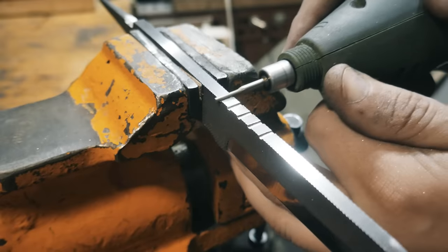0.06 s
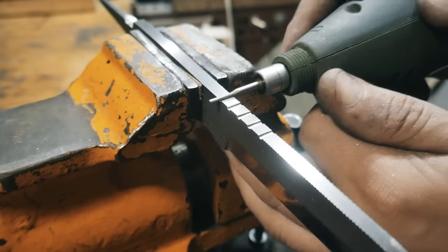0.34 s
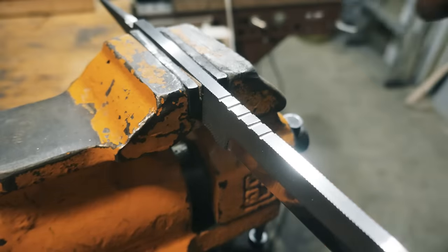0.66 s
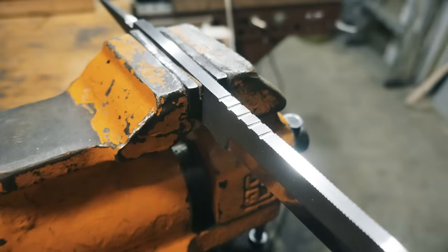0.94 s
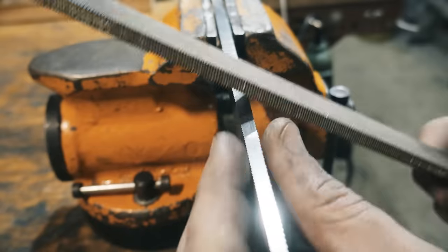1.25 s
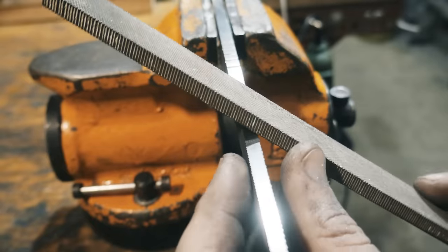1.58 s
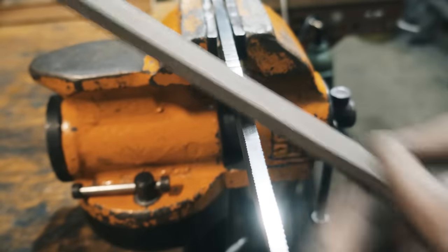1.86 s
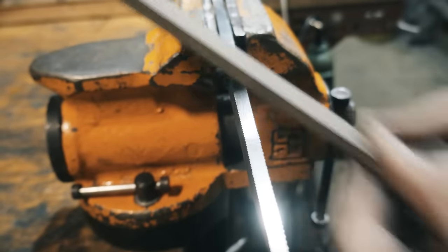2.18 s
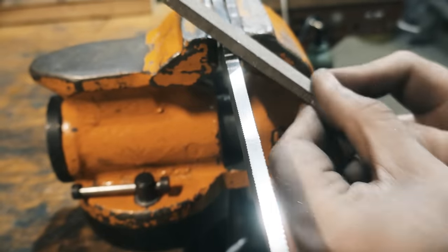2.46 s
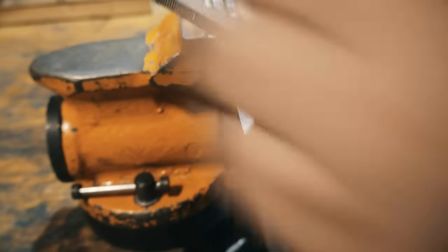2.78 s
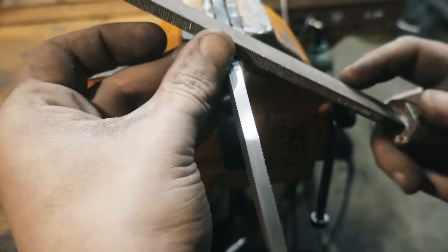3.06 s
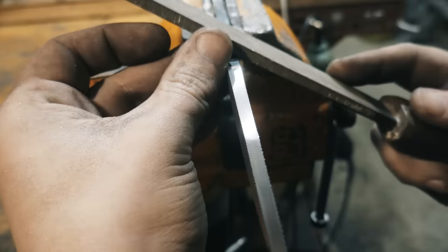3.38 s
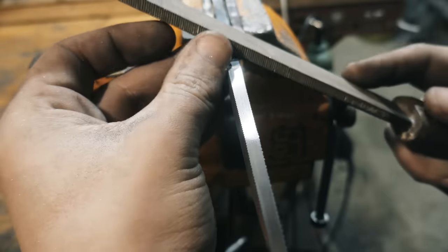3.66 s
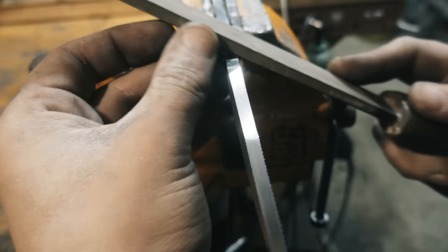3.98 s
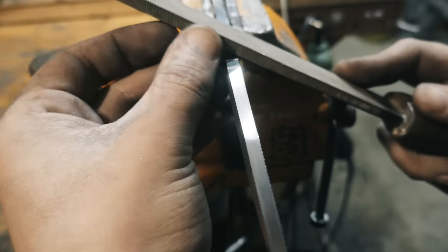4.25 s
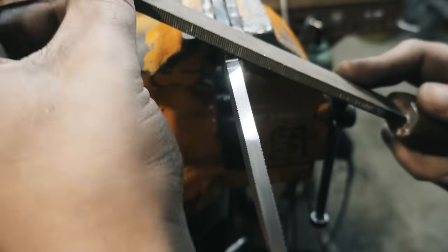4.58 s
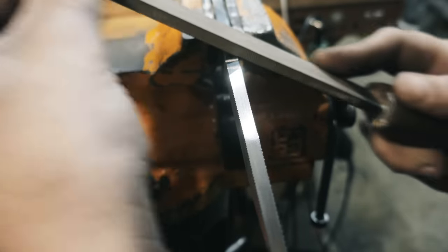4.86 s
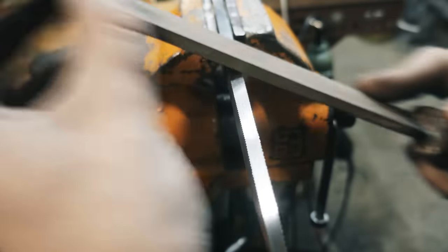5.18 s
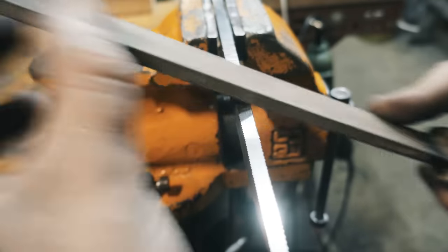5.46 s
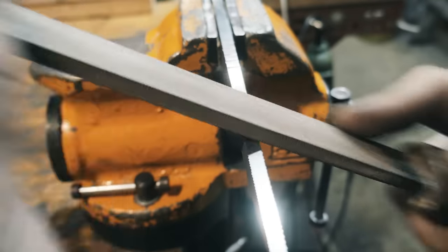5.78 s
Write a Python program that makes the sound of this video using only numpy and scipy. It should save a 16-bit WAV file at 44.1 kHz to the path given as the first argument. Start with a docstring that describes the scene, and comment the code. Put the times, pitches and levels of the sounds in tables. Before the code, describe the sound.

After a brief rotary tool whine, a hand file scrapes rapidly back and forth on a steel blade, knocking and shaking the vice.

```python
"""A rotary tool whines as its disc nicks a steel blade in a vice, grazes, runs free and is cut short at 1.2 s.
Fingers slide on the metal; a hand file is lined up with knocks, single passes and faint squeaks.
From 1.9 s to 6 s it rasps in runs of very quick strokes, with a firm, a light, then a flat grip:
its teeth set the steel ringing while vice and bench rumble and knock under the push.
The small, dry workshop hums quietly under the filing."""
import sys
import numpy as np
from scipy import signal
from scipy.fft import rfft, irfft, next_fast_len
from scipy.io import wavfile
from scipy.ndimage import uniform_filter1d

SR = 44100
rng = np.random.default_rng(int(sys.argv[2]) if len(sys.argv) > 2 else 0)


def int16_out(signal):
    """Quantize to a 16-bit WAV file."""
    q = np.round(np.clip(np.atleast_2d(signal).T, -1, 1) * 32767)
    wavfile.write(sys.argv[1], SR, q.astype(np.int16))


N = 265482
TIME = np.arange(N) / SR
PADDED = next_fast_len(N + SR // 2)
GRIP_CHANGES_S = (3.76, 4.94)   # firm to light, light to flat

# bench modes: f/Hz, width/Hz, relative level/dB
BENCH_MODES = [(67, 9, -8), (151, 44, 1.5), (206.7, 28.4, 5), (306, 31, -5), (371.4, 29, -6),
               (471, 32, -0.5)]
# stereo width at the bench: f/Hz, side minus mid/dB
BENCH_WIDTH = [(60, -19.5), (250, -24), (400, -14), (700, -6), (1300, -8), (2500, -12), (4400, -8),
               (8100, 2.5), (15000, -7)]
# balance at the bench: f/Hz, left minus right/dB
BENCH_PAN = [(200, .5), (700, 1.5), (1100, 1.5), (3300, 0.5), (4700, -4), (6200, -0.5), (8200, 2.5),
             (10000, 1.5), (15000, 0)]


def from_db(db):
    """Decibels to gain."""
    return 10 ** (np.asarray(db) / 20)


def rms_one(x):
    """Scale to rms 1."""
    return x / np.sqrt(np.mean(x ** 2) + 1e-20)


def in_time(rows):
    """Columns of a curve at every sample."""
    s, *columns = np.transpose(rows)
    return [np.interp(TIME, s, c) for c in columns]


def at_hz(points, hz):
    """Read a spectrum on a log-frequency axis."""
    f, value = np.transpose(points)
    return np.interp(np.log(hz), np.log(f), value)


def bins(size):
    """FFT frequencies in Hz, floored at 1."""
    return np.maximum(np.arange(size // 2 + 1) * SR / size, 1)


def drift(rate_hz):
    """Random curve through unit-variance knots."""
    knots = rng.standard_normal(2048)
    return np.interp(TIME * rate_hz, np.arange(len(knots)), knots)


def colour(spectrum, modes=(), size=PADDED):
    """Unit-power response: a broad spectrum with resonances on top."""
    f = bins(size)
    peaks = 1 + sum(from_db(db) / (1 + 2j * (f - hz) / width) for hz, width, db in modes)
    response = from_db(at_hz(spectrum, f)) * peaks
    return response / np.sqrt(np.mean(np.abs(response) ** 2))


def stereo(pair, response, width=BENCH_WIDTH, pan=BENCH_PAN, size=PADDED):
    """Two signals as mid and side, filtered and placed band by band."""
    mid, side = rfft(pair, size)
    f = bins(size)
    ears = np.array([[1], [-1]])
    spread = mid + ears * side * from_db(at_hz(width, f))
    placed = spread * from_db(ears * at_hz(pan, f) / 2)
    return irfft(placed * response, size)[:, :pair.shape[1]]


def stereo_noise(spectrum, modes=()):
    """Coloured noise placed at the bench."""
    return stereo(rng.standard_normal((2, N)), colour(spectrum, modes))


def swells(times_s, levels_db, width_s, tail_s, tail_db):
    """Envelope of Gaussian swells with exponential tails."""
    power = np.zeros(N)
    for s, db in zip(times_s, levels_db):
        near = slice(max(int(s * SR) - SR // 8, 0), int(s * SR) + SR // 8)
        power[near] += from_db(db) ** 2 * np.exp(-.5 * ((TIME[near] - s) / width_s) ** 2)
    pole = np.exp(-1 / (tail_s * SR))
    tail = signal.lfilter([1 - pole], [1, -pole], power + 1e-18)
    return np.sqrt(power + from_db(tail_db) ** 2 * tail)


def file_strokes(uneven_db=1.0, slip_s=0.0032, sing_spread=0.027, rasp_accent=0.31):
    """Single passes, then runs out and back at an even or quickening pace; columns as in touches."""
    # lining up: t/s, length/s, rasp level/dB, rumble level/dB, singing f/Hz
    touches = [(1.312, 0.041, -71, -83, 1380), (1.389, 0.048, -64.5, -52.5, 2170),
               (1.526, 0.11, -60.5, -40, 1450), (1.598, 0.036, -77, -53.5, 3860),
               (1.682, .03, -66, -58, 1190), (1.768, 0.043, -59, -38, 1180), (1.811, 0.058, -41, -35, 1030),
               (2.942, 0.018, -64, -61, 1130), (2.995, 0.034, -60.5, -54, 2420),
               (3.025, 0.035, -62.5, -57.5, 2240)]
    # runs: first t/s, last t/s, count, quickening/0-1, out minus back/dB, out f/Hz, back f/Hz
    runs = [(1.87, 2.233, 8, 0, 0.5, 3190, 2300), (2.292, 2.793, 12, 0.2, -2.5, 3380, 2180),
            (3.416, 3.665, 6, 0.36, -0.5, 1200, 2330), (3.847, 4.489, 18, 0.07, 6, 1330, 1630),
            (4.589, 5.088, 13, 0, -4, 1600, 2140), (5.137, 5.51, 9, 0, 3.5, 2090, 2740),
            (5.556, 6.02, 11, 0.02, 1, 2900, 1920)]
    # hand pressure: t/s, rasp level/dB, rumble level/dB
    pressure = [(1.87, -43.5, -31.5), (2.25, -41, -38), (2.731, -49, -40), (2.79, -66, -57.5),
                (3.42, -64.5, -44.5), (3.59, -55, -42.5), (3.67, -68.5, -55), (3.85, -54, -40),
                (4.02, -57.5, -44.5), (4.28, -47.5, -37.5), (4.4, -55.5, -42), (4.49, -47.5, -45),
                (4.59, -57, -40.5), (4.63, -47.5, -35), (4.9, -58, -45.5), (5.02, -42.5, -35),
                (5.25, -42.5, -41), (6, -45.5, -39)]
    pressure_s, rasp_db, rumble_db = np.transpose(pressure)
    rows = list(touches)
    for first_s, last_s, count, quickening, out_over_back_db, out_hz, back_hz in runs:
        along = np.linspace(0, 1, int(round(count)))
        s = first_s + (last_s - first_s) * along * (1 + quickening * (1 - along))
        going_out = np.arange(len(s)) % 2 == 0
        force, spot, slip = rng.standard_normal((len(s), 3)).T
        accent_db = out_over_back_db * (going_out - .5) + uneven_db * force
        rows += zip(s + slip_s * slip, np.gradient(s),
                    np.interp(s, pressure_s, rasp_db) + rasp_accent * accent_db,
                    np.interp(s, pressure_s, rumble_db) + accent_db,
                    np.where(going_out, out_hz, back_hz) * (1 + sing_spread * spot))
    return np.array(rows)


def rasp(strokes, gain_db=-2.5, bites_per_s=5000, duty=0.35, drag_db=-21, mode_spread_db=5.0, size=8192):
    """Teeth bite in dense, uneven clicks; each stroke meets a new spot and rings the steel differently."""
    # rasp spectrum per grip: f/Hz, relative level/dB
    firm = [(350, -40), (600, -8.5), (800, -9.5), (1100, -5.5), (1400, -4), (2200, -6), (2950, -5.5),
            (3300, -1.5), (4100, -13.5), (4700, -11), (5700, -24.5), (7500, -33), (12000, -28),
            (13700, -43), (15400, -31)]
    light = [(350, -20), (600, -30), (700, 3.5), (820, -10), (1100, -4.5), (2200, -6.5), (2700, -9),
             (3700, -11.5), (4600, -4), (5700, -21.5), (8200, -29), (12000, -29), (15400, -45)]
    flat = [(350, -32), (600, -13), (700, -3), (830, -7), (1100, -1.5), (1800, -3), (2200, -3.5),
            (2750, -3.5), (3650, -7.5), (4500, -3.5), (6700, -23.5), (9500, -29), (12200, -22.5),
            (13700, -44), (15400, -33)]
    # blade and vice modes: f/Hz, width/Hz, level re broad rasp/dB
    steel_modes = [(696, 42, 6), (932, 16, 3.5), (1094, 21.4, 7.5), (1312, 68, -7), (1553, 22.5, 6),
                   (1960, 64, -0.5), (2205, 53, 10), (2475, 29, 6), (2720, 11, 6.5), (3190, 22, -5),
                   (3345, 19, -2.5), (4560, 114, -9), (6155, 58, 5), (8220, 450, 4), (12800, 240, -23)]
    sing_width_hz, sing_db = 130, 5.5
    bark_hz, bark_width_hz, settle_s = 900, 720, 1.77
    dulling, firm_stroke_db = 0.21, -42.5
    bites = from_db(2.5 * np.minimum(rng.exponential(1, N), 4)) * (rng.random(N) < bites_per_s / SR)
    grit = rng.standard_normal((2, N)) * (rms_one(bites) + 1)
    chatter = from_db(1.75 * drift(300))
    teeth = np.pad(rms_one(grit * chatter), ((0, 0), (0, size)))
    t = (np.arange(size) - size // 2) / SR
    octaves = np.log2(np.clip(bins(size), 600, 5000) / 600)
    out = np.zeros((2, N + size))
    for s, length_s, level_db, _, sing_hz in strokes:
        # the file speeds up, slows down, then drags lightly as it turns round
        push = np.exp(-np.abs(t / (duty * length_s)) ** 2.12)
        push += from_db(drag_db) * np.exp(-(2 * t / length_s - .5) ** 2)
        modes = [(hz, width, db + mode_spread_db * rng.standard_normal())
                 for hz, width, db in steel_modes]
        bark_db = 6 - 40 * abs(s - settle_s)   # the blade barks as the file settles on the fresh edge
        modes += [(sing_hz, sing_width_hz, sing_db), (bark_hz, bark_width_hz, bark_db)]
        spectrum = (firm, light, flat)[np.searchsorted(GRIP_CHANGES_S, s)]
        tilt = from_db(dulling * (level_db - firm_stroke_db) * octaves)   # gentler is duller
        span = slice(int(s * SR) - size // 2, int(s * SR) + size // 2)
        stroke = stereo(teeth[:, span] * push, tilt * colour(spectrum, modes, size), size=size)
        out[:, span] += from_db(level_db + gain_db) * rms_one(stroke) * np.sqrt(np.mean(push ** 2))
    return out[:, :N]


def bench_rumble(strokes, gain_db=-4.5, lag_s=0.0035):
    """The drag of each stroke shakes vice and bench, which answer a little late."""
    # rumble spectrum per grip: f/Hz, relative level/dB
    firm = [(30, -40), (90, -22), (135, 4), (210, 0), (330, 2.5), (600, -10.5), (800, -48)]
    light = [(30, -23), (60, -5.5), (105, -12), (180, 3.5), (330, -5.5), (600, -16.5), (800, -55.5)]
    flat = [(30, -36), (65, -12), (110, -15), (190, 2), (270, -3), (600, -15.5), (800, -48.5)]
    s, _, _, level_db, _ = strokes.T
    per_grip = [stereo_noise(spectrum, BENCH_MODES) for spectrum in (firm, light, flat)]
    shake = np.choose(np.searchsorted(GRIP_CHANGES_S, TIME), per_grip)
    local_rms = np.sqrt(uniform_filter1d(np.mean(shake ** 2, axis=0), size=1100) + 1e-9)
    envelope = swells(s + lag_s, level_db + gain_db, width_s=0.0098, tail_s=0.013, tail_db=-3)
    return shake / local_rms * envelope


def rotary_tool(stop_s=1.179, jitter=0.0034, chop=0.46, bounce_hz=17.66, bounce_db=2.5, grind_db=-70):
    """Shaft harmonics change as the disc leaves the steel; air and grinding are chopped once a turn."""
    # shaft speed: t/s, f/Hz
    speed = [(0.03, 540), (0.116, 550), (0.21, 545.0), (0.282, 533.3), (0.444, 526), (0.544, 537.0),
             (0.744, 549.2), (1.018, 552), (1.15, 550)]
    # tool levels: t/s, shaft tone/dB, third harmonic/dB, hiss/dB
    levels = [(0.0, -47.5, -71, -61.5), (0.066, -44.5, -61.5, -65.5), (0.268, -51.5, -66.5, -67.5),
              (0.436, -52, -69.5, -68.5), (0.468, -49, -74, -68.5), (0.6, -49, -63.5, -68),
              (0.732, -54, -55.5, -68), (0.856, -51, -54, -63), (1.16, -51, -51, -64.5)]
    # shaft harmonics, cutting and running free: multiple, level/dB
    cutting = [(2, -69), (4, -68), (5, -69), (6, -78), (7, -77), (8, -86), (9, -73.5), (10, -78.5),
               (11, -76.5), (12, -78), (13, -86), (14, -86), (15, -89), (16, -92), (17, -75), (18, -71.5),
               (19, -79), (20, -82), (21, -92), (22, -80), (23, -92), (24, -78), (25, -84), (26, -85)]
    free = [(2, -77), (4, -66), (5, -77), (6, -59), (7, -70), (8, -65.5), (9, -80), (10, -90), (11, -90),
            (12, -83), (13, -85), (14, -89), (15, -86), (16, -87), (17, -90), (18, -76), (19, -86),
            (20, -77), (21, -84), (22, -80), (23, -81), (24, -84), (27, -85)]
    # cooling air and disc hiss: f/Hz, relative level/dB
    air_spectrum = [(90, -31), (250, -6.5), (600, 1.5), (1000, -1), (1800, 8.5), (2500, 4), (3100, -1.5),
                    (4600, 0), (6500, -9.5), (9500, -5), (12500, -6), (15500, -12)]
    # disc grinding on steel: f/Hz, relative level/dB
    grind_spectrum = [(1500, -14), (3500, -2), (5300, 7), (7000, -1), (8800, 6), (9550, 6), (10500, 2),
                      (13000, -7), (15500, -7)]
    # stereo width: f/Hz, side minus mid/dB
    width = [(100, 2), (700, -15.5), (2400, -15), (4400, -10), (8100, 3), (15000, -7)]
    # balance: f/Hz, left minus right/dB
    pan = [(540, 0), (1600, -4.5), (3300, -0.5), (4500, -3.5), (5700, -4), (7000, -1), (10000, -1),
           (15000, -2)]
    shaft_hz, = in_time(speed)
    shaft_db, third_db, hiss_db = in_time(levels)
    contact = disc_contact()
    phase = 2 * np.pi * np.cumsum(shaft_hz * (1 + jitter * contact * drift(150.8))) / SR
    swing_db = bounce_db * np.cos(2 * np.pi * bounce_hz * (TIME - .26))
    judder = contact * from_db(swing_db + 3.5 * np.tanh(drift(72)))   # the disc bites unevenly
    whine = np.zeros((2, N))
    for k in range(1, 29):
        # unbalance tones 1 and 3 are firm; the rest flutter with the cut and the bearing play
        waver_db = 6 * np.tanh(drift(28.8))
        play_db = 3.5 * drift(11.86)
        loaded = judder * from_db(np.interp(k, *np.transpose(cutting)) - 1.5 + waver_db)
        idle = (1 - contact) * from_db(np.interp(k, *np.transpose(free)) + play_db)
        gain = from_db(shaft_db) if k == 1 else from_db(third_db) if k == 3 else np.hypot(loaded, idle)
        hz = k * shaft_hz[0]
        angle = k * phase + rng.uniform(0, 2 * np.pi)
        side = from_db(at_hz(width, hz)) * np.cos(angle)
        for ear, sign in enumerate((1, -1)):
            balance = from_db(sign * at_hz(pan, hz) / 2)
            whine[ear] += np.sqrt(2) * balance * gain * (np.sin(angle) + sign * side)
    air, grit = rng.standard_normal((2, 2, N)) * (1 + chop * np.sin(phase))
    hiss = stereo(air * from_db(hiss_db + 1), colour(air_spectrum), width, pan)
    grinding = stereo(grit * judder * from_db(grind_db), colour(grind_spectrum), width, pan)
    running = np.clip((stop_s - TIME) / .01, 0, 1)
    return running * (whine + hiss + grinding)


def disc_contact(bite_s=0.039, graze_s=0.49, lift_s=0.88, ramp_s=0.21, graze_share=0.41):
    """Contact of disc and steel, 0-1: it bites, eases to a graze and lifts off."""
    bitten, eased, lifted = (np.clip((TIME - s) / ramp_s + .5, 0, 1) for s in (bite_s, graze_s, lift_s))
    return bitten * (1 - (1 - graze_share) * eased) * (1 - lifted)


def knocks(gain_db=-10, spread_db=1.5, band_hz=(110, 380)):
    """The file lands or catches: soft blows on the bench modes."""
    # blows: t/s, level/dB
    landings = [(1.39, -39.5), (1.521, -31), (1.67, -42.5), (1.79, -30), (1.867, -26.5), (2.618, -29.5),
                (2.992, -39), (3.473, -36.5), (3.84, -29), (4.084, -34.5), (4.448, -28.5), (4.493, -31),
                (4.944, -32), (5.12, -30), (5.915, -26.5)]
    s, level_db = np.transpose(landings)
    out = np.zeros(N)
    for hz, width_hz, mode_db in BENCH_MODES:
        blows = np.zeros(N)
        scatter_db = spread_db * rng.standard_normal(len(s))
        blows[(s * SR).astype(int)] = from_db(level_db + mode_db + gain_db + scatter_db)
        radius, angle = np.exp(-np.pi * width_hz / SR), 2 * np.pi * hz / SR
        out += signal.lfilter([1, -1], [1, -2 * radius * np.cos(angle), radius ** 2], blows + 1e-18)
    return signal.sosfilt(signal.butter(2, band_hz, "band", fs=SR, output="sos"), out)


def low_swells():
    """Soft, deep rumbles swell briefly under the filing."""
    # swells: t/s, level/dB
    swell_times = [(1.9, -59), (4.64, -62.5), (4.8, -54.5)]
    # deep rumble: f/Hz, relative level/dB
    spectrum = [(25, -18), (45, -1), (68, 3), (95, 7), (130, 0), (200, -20), (400, -59)]
    envelope = swells(*np.transpose(swell_times), width_s=0.057, tail_s=0.049, tail_db=-4)
    return stereo_noise(spectrum) * envelope


def fingers():
    """Skin swishes softly over the steel as the grip shifts."""
    # slides: t/s, level/dB
    slides = [(1.315, -76.5), (1.4, -78), (1.52, -74), (2.77, -100), (3.49, -83.5)]
    # skin friction: f/Hz, relative level/dB
    spectrum = [(5000, -10), (11000, 3.5), (14500, 5)]
    return stereo_noise(spectrum) * swells(*np.transpose(slides), width_s=0.014, tail_s=.02, tail_db=-23)


def squeaks(waver_hz=25):
    """The file's corner slides into place on the steel with thin, unsteady tones."""
    # squeaks: t/s, f/Hz, level/dB
    tones = [(1.60, 3920, -81), (1.64, 3270, -87), (1.68, 3350, -85), (1.71, 3920, -89)]
    out = np.zeros(N)
    for s, hz, db in tones:
        phase = 2 * np.pi * np.cumsum(hz + waver_hz * drift(200)) / SR
        out += np.sqrt(2) * np.sin(phase) * swells([s], [db], width_s=0.0095, tail_s=.02, tail_db=-19)
    return out


def add_room(x, t60_s=0.09, wet_db=-19, delay_s=.006):
    """Add a faint diffuse tail, different at each ear."""
    t = TIME[:SR // 2]
    tail = rng.standard_normal((2, len(t))) * 1000 ** (-t / t60_s) * (t > delay_s)
    tail /= np.sqrt(np.sum(tail[0] ** 2))
    return x + from_db(wet_db) * signal.fftconvolve(x, tail, axes=1)[:, :N]


def shop_noise():
    """Low, quiet room noise that comes up as the tool stops."""
    # room noise: f/Hz, relative level/dB
    spectrum = [(30, -13), (70, -6.5), (130, -4.5), (210, 7), (330, -4), (550, -16.5), (1500, -22),
                (3500, -29.5), (7000, -44), (11000, -33), (15500, -38)]
    # its course: t/s, level/dB
    levels = [(0, -87), (1.16, -100), (1.18, -70), (1.73, -68), (2.7, -68.5), (3.15, -70.5), (3.8, -72),
              (6, -68)]
    level_db, = in_time(levels)
    return from_db(level_db) * stereo_noise(spectrum)


def scene():
    """The dry tool, then the filing with its room tail, over the shop noise."""
    background = shop_noise()
    strokes = file_strokes()
    tool = rotary_tool()
    filing = rasp(strokes) + bench_rumble(strokes) + knocks() + fingers() + squeaks() + low_swells()
    return tool + add_room(filing) + background


def record(dry):
    """Steep low-pass."""
    cutoff_hz = 15500
    return signal.sosfilt(signal.ellip(10, .1, 70, cutoff_hz, fs=SR, output="sos"), dry)


dry = scene()
out = record(dry)
int16_out(out)
```